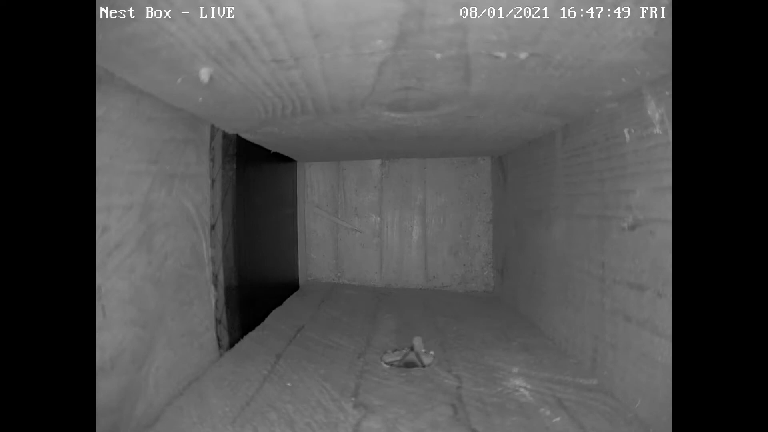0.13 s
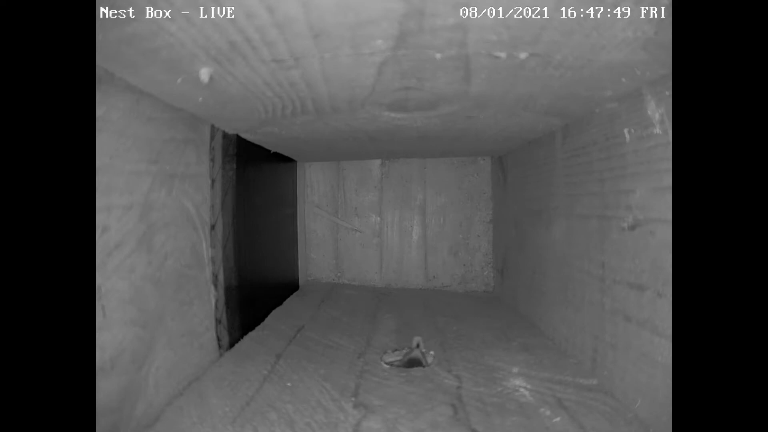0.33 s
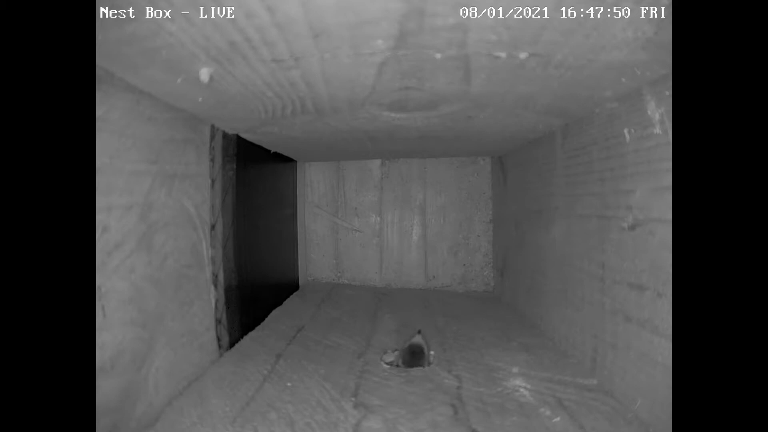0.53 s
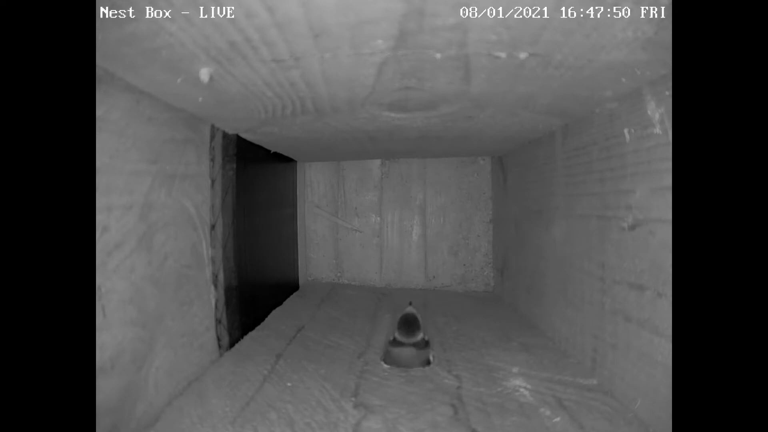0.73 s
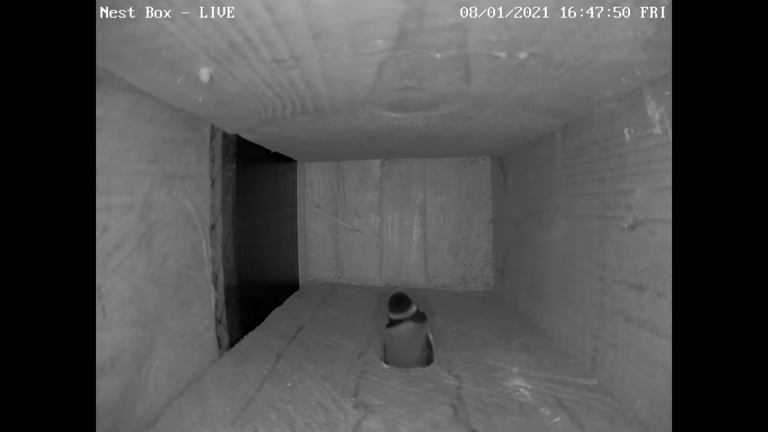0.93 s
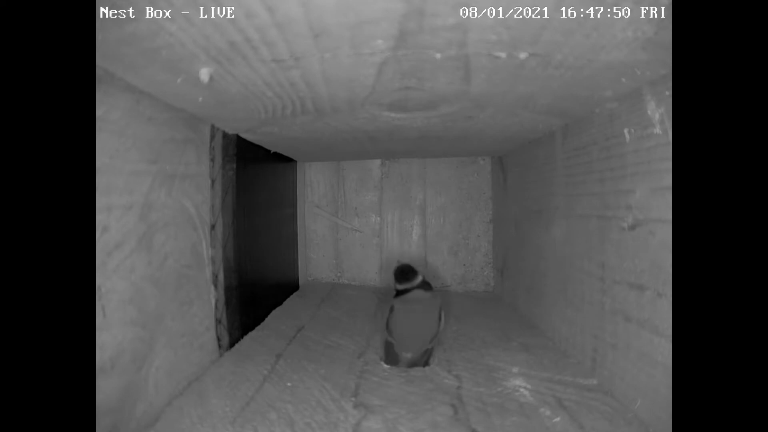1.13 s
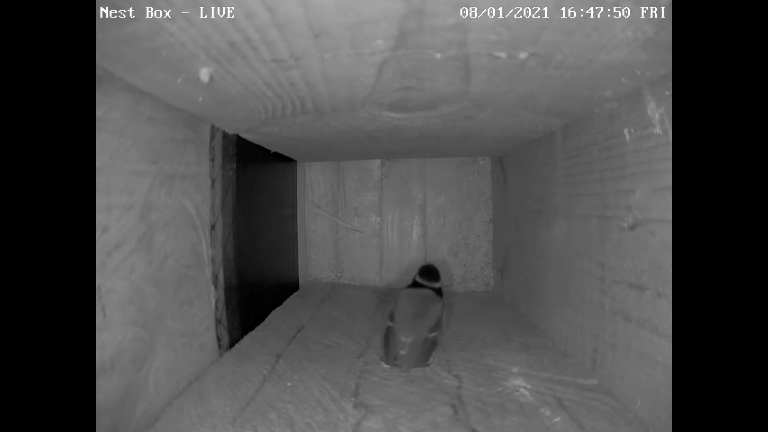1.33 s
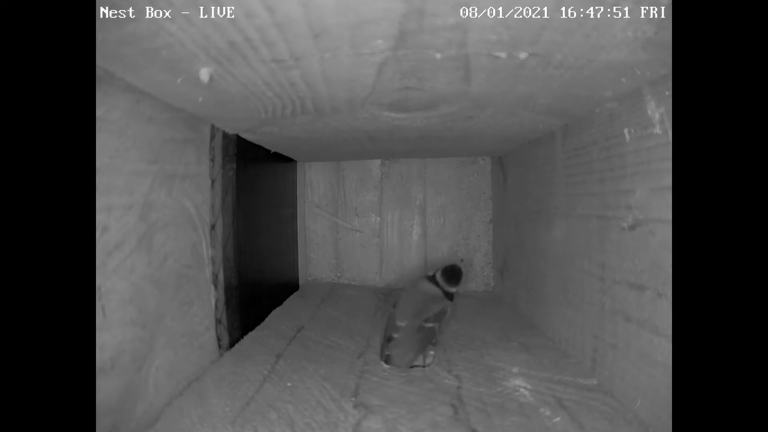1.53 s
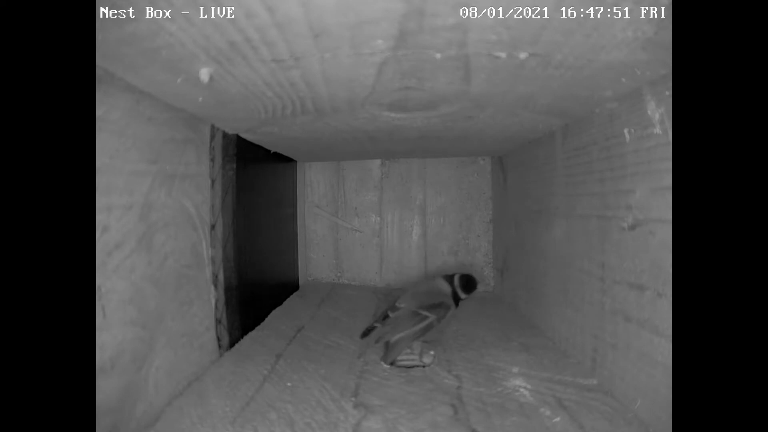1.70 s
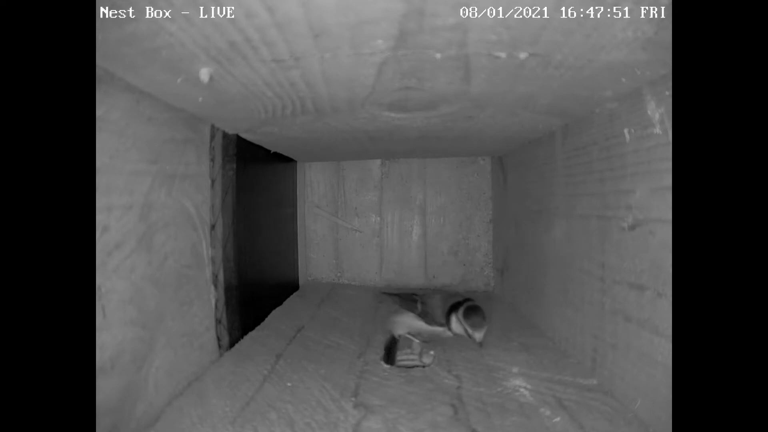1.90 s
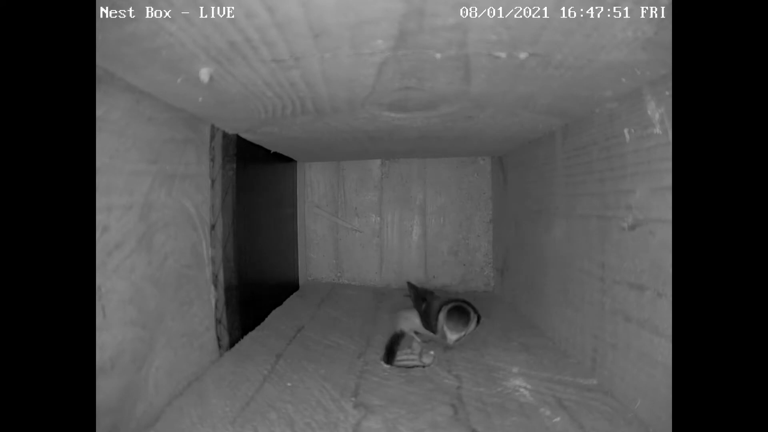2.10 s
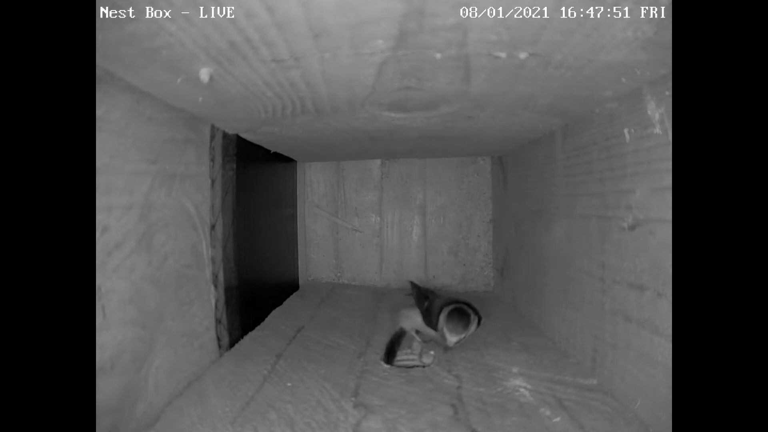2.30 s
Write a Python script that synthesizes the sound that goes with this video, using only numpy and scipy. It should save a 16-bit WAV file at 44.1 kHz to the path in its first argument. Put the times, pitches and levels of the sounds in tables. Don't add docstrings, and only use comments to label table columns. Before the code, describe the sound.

A small bird enters a wooden nest box, heard close from inside. Low wind and distant traffic rumble throughout, almost alone at first, with a faint bump near 0.25 s. From 0.6 s feathers rub and claws scratch, building to a dull landing thump at 1.07 s. A sharp scratchy knock comes at 1.29 s, then sparse scrapes near 1.6, 1.75 and 2.04 s, fading into quiet hum.

```python
import sys
import numpy as np
from scipy import signal
from scipy.fft import rfft, irfft
from scipy.io import wavfile
from scipy.ndimage import uniform_filter1d

SR = 44100
rng = np.random.default_rng(int(sys.argv[2]) if len(sys.argv) > 2 else 0)


def gain_from_db(level_db):
    decades = np.asarray(level_db, float) / 20
    return 10 ** decades


def int16_out(signal):
    q = np.round(np.clip(np.atleast_2d(signal).T, -1, 1) * 32767)
    wavfile.write(sys.argv[1], SR, q.astype(np.int16))


N = 103635


def unit(x):
    return x / np.sqrt(np.mean(x ** 2) + 1e-20)


def drift(hz):
    r = np.exp(-2 * np.pi * hz / SR)
    noise = rng.standard_normal(N + SR)
    return unit(signal.lfilter([1], [1, -2 * r, r * r], noise)[SR:])


def coloured(points):
    hz, db = np.transpose(points)
    log_hz = np.log(np.arange(N // 2 + 1) * SR / N + 1)
    gain = gain_from_db(np.interp(log_hz, np.log(hz), db, -90, -90))
    return unit(irfft(rfft(rng.standard_normal(N)) * gain, N))


def around(x, hz, octaves, order=1):
    edges_hz = np.clip(hz * 2.0 ** (np.array([-.5, .5]) * octaves), 100, .45 * SR)
    return unit(signal.sosfilt(signal.butter(order, edges_hz, "band", fs=SR, output="sos"), x))


def shape(start_s, attack_s, hold_s, t60_s):
    t = np.arange(N) / SR - start_s
    release = gain_from_db(-60 * np.clip(t - hold_s, 0, 9) / t60_s)
    return np.clip(t / attack_s, 0, 1) ** 2 * release


def ring(force, hz, t60_s):
    r = gain_from_db(-60 / (t60_s * SR))
    w = 2 * np.pi * hz / SR
    return signal.lfilter([0, np.sin(w)], [1, -2 * r * np.cos(w), r * r], force + 1e-18)


def rumble(sway_db):
    # hz, density_db_per_hz
    hum = [(10, -6), (27, 2), (55, -9), (77, -4), (100, -11.5), (135, -8), (175, -19), (260, -36.5)]
    split_hz, evenness, deep_follows = 55, .45, .7
    noise = coloured(hum)
    deep = signal.sosfiltfilt(signal.butter(3, split_hz, fs=SR, output="sos"), noise)
    upper = noise - deep
    power = upper ** 2
    local_power = uniform_filter1d(power, size=3500) + 1e-9
    upper = upper * (np.mean(power) / local_power) ** (evenness / 2)
    mean_db = sway_db.mean()
    deep_db = mean_db + deep_follows * (sway_db - mean_db)
    return gain_from_db(deep_db) * deep + gain_from_db(sway_db) * upper


def outside(sway_db):
    # hz, density_db_per_hz
    spectrum = [(110, -15), (180, -10), (243, -15), (356, -4.5), (418, -13.5), (631, -18), (728, -18),
                (1150, -20), (8000, -43.5), (10400, -89), (17600, -120)]
    level_db, follows = -61.5, 0.36
    return gain_from_db(level_db + follows * (sway_db - sway_db.mean())) * coloured(spectrum)


def box_air(x):
    # hz, width_hz, gain_db
    peaks = [(364, 25, 5.5), (640.7, 27, 11), (827, 11, 5.5), (1201, 147, 15), (1558, 110, 11.5),
             (1780, 72, 7.5), (2295, 80, 5), (2550, 130, 4.5), (3040, 22, 9), (3200, 110, -4.5),
             (4150, 140, 3.5), (4990, 68, 4), (6440, 40, 4.5), (6750, 110, 6.5)]
    # hz, width_hz, gain_db
    dips = [(703, 14, -14), (1319.5, 176, -20), (1994, 28, -10), (2180, 58, -17.5), (2423, 64, -13),
            (2710, 48, -13), (5700, 730, -2)]
    rows = []
    for hz, width_hz, db in [*peaks, *dips]:
        a, w, q = gain_from_db(db / 2), 2 * np.pi * hz / SR, np.pi * width_hz / SR
        top = [1 + q * a, -2 * np.cos(w), 1 - q * a]
        bottom = [1 + q / a, -2 * np.cos(w), 1 - q / a]
        rows.append(np.array(top + bottom) / (1 + q / a))
    return signal.sosfilt(rows, x)


def bumps():
    # start_s, peak_db, tilt_db_per_octave (hardness)
    hits = [(0.003, -43.5, -11), (0.208, -43.5, -9.5), (0.263, -44.5, -5), (0.62, -39, -5.5),
            (0.739, -32.5, -10), (0.906, -28.5, -16), (0.93, -36.5, -16), (0.965, -34, -16),
            (1.065, -34.5, -11.5), (1.077, -34, -7), (1.114, -34, -7.5), (1.234, -38, -15),
            (1.287, -26.5, -6), (1.312, -30, 3), (1.596, -44.5, -7.5), (2.041, -44, -9)]
    # hz, level_db, t60_s
    modes = [(135, 3.5, 0.076), (271.6, -6, 0.14), (355.3, -1, 0.099), (459.5, -8, 0.089),
             (636.7, -8.5, 0.1), (795, -10.5, 0.061), (1000, -21, 0.058)]
    push_s, bump_db, soft_hz = 0.01205, -2.5, 395
    start_s, db, tilt_db = np.transpose(hits)
    steps = np.arange(3)
    at = ((start_s[:, None] + steps * push_s / 3) * SR).astype(int)
    out = 0
    for hz, mode_db, t60_s in modes:
        level_db = db + bump_db + mode_db + tilt_db * max(np.log2(hz / soft_hz), 0)
        ragged = rng.uniform(.65, 1, at.shape)
        sign = np.where(steps, rng.choice([-.35, .35], at.shape), 1)
        force = np.zeros(N)
        force[at] = gain_from_db(level_db)[:, None] * ragged * sign
        size = int(2 * SR / hz)
        soft = np.hanning(size) * np.cos(2 * np.pi * hz / SR * np.arange(size))
        out = out + ring(np.convolve(force, 4 * soft / size)[:N], hz, t60_s)
    return out


def barb_slips():
    barbs_per_s, spread_db, patch_db, patch_hz = 3500, 2, 1.0, 25
    sizes = gain_from_db(spread_db * np.minimum(rng.exponential(1, N), 4)) * rng.choice([-1, 1], N)
    slips = sizes * (rng.random(N) < barbs_per_s / SR)
    out = 0
    for hz in 560 * 2 ** np.arange(0, 4.1, .25):
        patch = gain_from_db(patch_db * drift(patch_hz))
        out = out + np.sqrt(hz) * patch * around(slips, hz, .25, order=2)
    return out


def rubs():
    # start_s, hold_s,
    # level_db, centre_hz, attack_s
    strokes = [(0.257, 0.0097, -62.5, 4500, 0.009), (0.63, 0.0044, -57.5, 1480, 0.00103),
               (0.631, 0.061, -66.5, 5370, 0.0046), (0.696, 0.021, -54, 3600, 0.0066),
               (0.713, 0.034, -51.5, 4200, 0.02), (0.756, 0.0071, -56, 4500, 0.0046),
               (0.803, 0.095, -71.5, 5000, 0.0081), (0.823, 0.077, -54, 4600, 0.037),
               (0.909, 0.059, -44.5, 4880, 0.012), (0.967, 0.044, -48.5, 4950, 0.021),
               (1.035, 0.091, -48, 4900, 0.024), (1.02, 0.05, -67.5, 4970, 0.01),
               (1.182, 0.066, -48, 4580, 0.055), (1.242, 0.042, -40.5, 5200, 0.021),
               (1.284, 0.036, -45, 4200, 0.006), (1.291, 0.022, -49, 1000, 0.0063),
               (1.335, 0.029, -53.5, 5000, 0.0088), (1.381, 0.49, -74, 5060, 0.015),
               (1.534, 0.071, -55.5, 5000, 0.031), (1.595, 0.084, -61.5, 5230, 0.044),
               (1.695, 0.11, -52.5, 6400, 0.043), (1.832, 0.25, -71.5, 5440, 0.022),
               (1.93, 0.024, -59, 6300, 0.03), (1.982, 0.075, -60, 3500, 0.052),
               (2.105, 0.21, -73.5, 5330, 0.011), (2.218, 0.039, -63.5, 6000, 0.013)]
    release_t60_s, octaves, flutter_db, flutter_hz = 0.093, 1.28, -0.5, 60
    slips = barb_slips() * gain_from_db(flutter_db * drift(flutter_hz))
    out = 0
    for start_s, hold_s, db, hz, attack_s in strokes:
        stroke = shape(start_s, attack_s, hold_s, release_t60_s)
        out = out + gain_from_db(db) * stroke * around(slips, hz, octaves)
    return out


def landing():
    # start_s, level_db, pitch_hz
    shifts = [
        (0.27, -33, 75),
        (0.711, -24.5, 45),
        (0.912, -29, 265),
        (0.973, -23.5, 72),
        (1.101, -25, 80),
        (1.289, -25.5, 200),
        (1.299, -25.5, 135),
        (2.035, -28.5, 140),
    ]
    land_s, land_db, land_hz, land_t60_s = 1.0735, -11.5, 117, .07
    out = 0
    for start_s, db, hz in [(land_s, land_db, land_hz), *shifts]:
        turns = (np.arange(N) / SR - start_s) * hz
        swell = np.sin(np.pi * np.clip(turns / 1.5, 0, 1)) ** 2
        push = swell * -np.cos(2 * np.pi * turns)
        out = out + gain_from_db(db) * ring(push / np.abs(push).sum(), hz, land_t60_s * land_hz / hz)
    return out


def rings():
    # start_s, level_db, pitch_hz, length_s
    caught = [(0.618, -51, 1558, 0.018), (0.721, -51.5, 1558, 0.028), (0.76, -56.5, 1558, 0.016),
              (0.91, -42.5, 1558, 0.014), (.947, -51.5, 1558, 0.0082), (0.995, -52, 1558, .014),
              (1.012, -56, 1558, 0.016), (0.961, -53, 1558, 0.023), (1.068, -42, 1558, 0.037),
              (1.264, -49, 1558, 0.02), (1.29, -52.5, 1558, 0.0048), (1.311, -43.5, 1558, 0.015),
              (1.325, -54.5, 1558, 0.017), (1.585, -55, 1558, 0.021), (1.736, -41, 1558, 0.056),
              (2.021, -62, 1558, 0.012), (2.041, -49.5, 1558, 0.0097), (2.056, -59, 1558, 0.01),
              (0.66, -47, 4300, 0.017), (0.663, -52, 4080, 0.008), (0.662, -50, 5370, 0.015),
              (.663, -48, 6450, 0.006), (0.7, -53, 6450, 0.014), (0.711, -42, 6400, 0.015),
              (0.738, -45, 6450, 0.015), (1.258, -48.5, 2550, 0.02), (0.925, -50, 2550, .02),
              (1.082, -51, 2550, .015), (0.934, -51, 4150, 0.022), (0.7, -56, 2350, 0.014),
              (0.701, -52, 3340, 0.012), (0.86, -51.5, 3720, 0.0084), (0.959, -43, 6880, 0.0091),
              (1.11, -47.5, 2550, 0.014), (1.294, -39, 6040, 0.0064), (1.3, -37, 3400, 0.015),
              (1.3, -50.5, 2300, 0.015), (1.595, -45, 4180, 0.014), (1.801, -39, 6500, 0.011),
              (1.819, -46.5, 6500, 0.025), (1.956, -55.5, 3050, 0.017), (1.993, -60, 3020, 0.016),
              (2.022, -60, 3100, 0.012), (2.044, -51, 3050, 0.0072), (2.037, -46, 4430, 0.011),
              (1.967, -49, 7630, 0.011)]
    ring_db, t60_cycles, roughness = 8.5, 60, .4
    t = np.arange(N) / SR
    rough = 1 + roughness * drift(150.0)
    out = 0
    for start_s, db, hz, length_s in caught:
        swell = np.sin(np.pi * np.clip((t - start_s) / length_s, 0, 1)) ** 2
        push = swell * rough * np.cos(2 * np.pi * hz * t)
        out = out + gain_from_db(db + ring_db) * ring(push * 4 / (length_s * SR), hz, t60_cycles / hz)
    return out


def claws():
    # start_s, peak_db, centre_hz
    scratches = [(0.622, -41, 3200), (0.6632, -37, 5460), (0.743, -37, 3770), (0.845, -43, 5000),
                 (0.949, -34, 2900), (0.992, -36.5, 4430), (0.705, -60, 6260), (0.9138, -37, 4150),
                 (0.961, -30, 6880), (1.0513, -35, 4550), (1.0738, -29, 6300), (1.1107, -30, 5160),
                 (1.2364, -40, 4150), (1.288, -29, 1950), (1.2898, -18, 6910), (1.302, -27, 2870),
                 (1.314, -26, 7000), (1.318, -33, 2260), (1.343, -45, 3950), (1.5651, -48, 4900),
                 (1.593, -36, 5600), (1.7578, -30.5, 6800), (1.8045, -36, 6640), (1.965, -47, 2980),
                 (1.964, -42.5, 6700), (2.045, -38.5, 3280), (2.231, -50, 6440)]
    attack_s, hold_s, t60_s = .0007, 0.0064, 0.031
    octaves, claw_db, slips_per_s = 0.94, -14, 14000
    sizes = rng.uniform(0.63, 1, N) * rng.choice([-1, 1], N)
    slips = sizes * (rng.random(N) < slips_per_s / SR)
    out = 0
    for start_s, db, hz in scratches:
        scratch = shape(start_s, attack_s, hold_s, t60_s)
        out = out + gain_from_db(db + claw_db) * scratch * around(slips, hz, octaves, order=2)
    return out


def scene():
    # time_s, level_db
    sway = [
        (0.0, -39),
        (0.26, -46.5),
        (0.58, -35.5),
        (0.69, -37.5),
        (0.989, -29),
        (1.16, -36),
        (1.3, -34.5),
        (1.899, -41),
        (2.23, -43.5),
        (2.35, -45.5),
    ]
    sway_db = np.interp(np.arange(N) / SR, *np.transpose(sway))
    direct = rumble(sway_db) + bumps() + landing() + rings()
    return (direct + box_air(outside(sway_db) + rubs() + claws()))[None]


def low_pass(x, hz):
    return signal.sosfiltfilt(signal.cheby2(9, 45, hz * 1.07, fs=SR, output="sos"), x)


def spans(rows):
    t = np.arange(N) / SR
    inside = sum(1. * ((t > start_s) & (t < start_s + length_s)) for start_s, length_s in rows)
    return uniform_filter1d(inside, size=130)


def roll_off(x):
    return signal.sosfilt(signal.butter(12, 16500, fs=SR, output="sos"), x)


def record(dry):
    # start_s, length_s
    drops = [
        (.597, .034),
        (1.984, .12),
    ]
    # start_s, length_s
    thinned = [
        (.042, .02),
        (.34, .022),
    ]
    wide_hz, narrow_hz, thinned_hz, thinned_loss = 8278, 5060, 2000, .7
    glitch_s, glitch_db, glitch_low_db, hiss_db = .6232, -39.5, -27, -104.5
    click = 1. * (np.arange(N) == int(glitch_s * SR))
    source = dry + gain_from_db(glitch_low_db) * click
    wide = low_pass(source, wide_hz)
    narrow = low_pass(source, narrow_hz)
    dull = low_pass(source, thinned_hz)
    stream = wide + spans(drops) * (narrow - wide) + thinned_loss * spans(thinned) * (dull - wide)
    hiss = gain_from_db(hiss_db) * rng.standard_normal(N)
    top_limit = signal.cheby2(12, 40, 16500, fs=SR, output="sos")
    extra = signal.sosfilt(top_limit, gain_from_db(glitch_db) * click + hiss)
    return roll_off(stream + extra)


dry = scene()
out = record(dry)
int16_out(out)
```